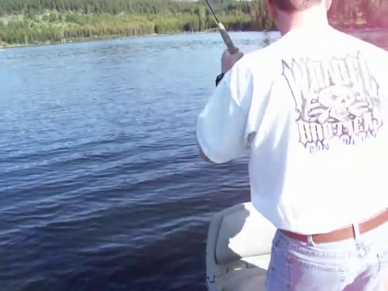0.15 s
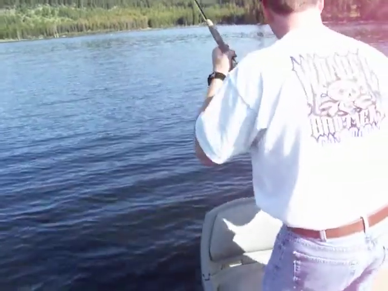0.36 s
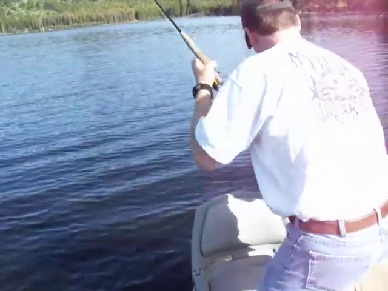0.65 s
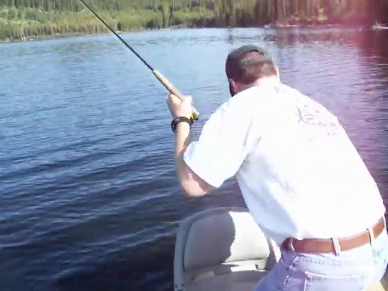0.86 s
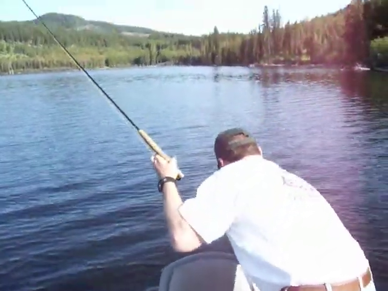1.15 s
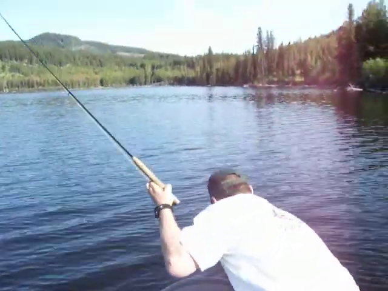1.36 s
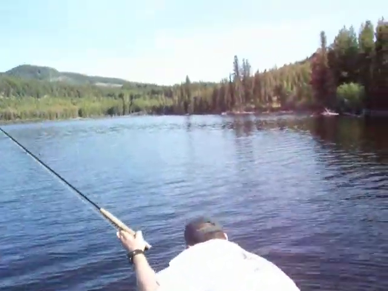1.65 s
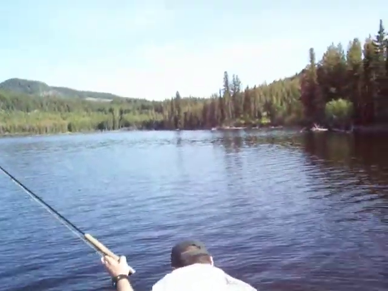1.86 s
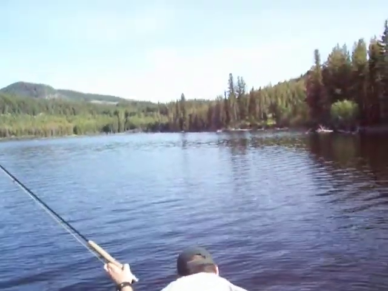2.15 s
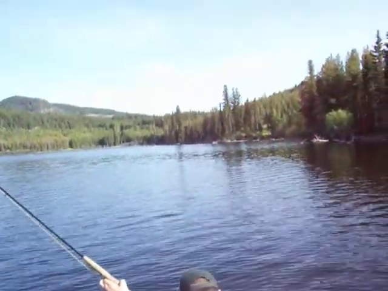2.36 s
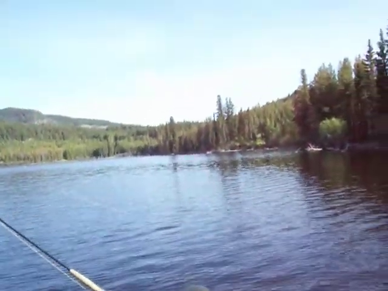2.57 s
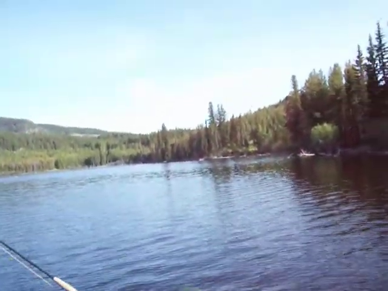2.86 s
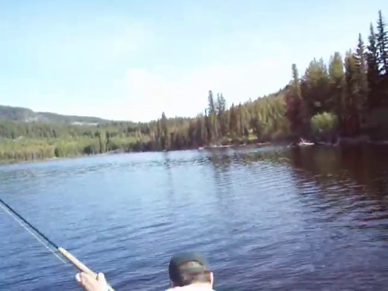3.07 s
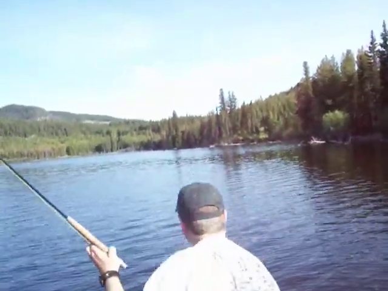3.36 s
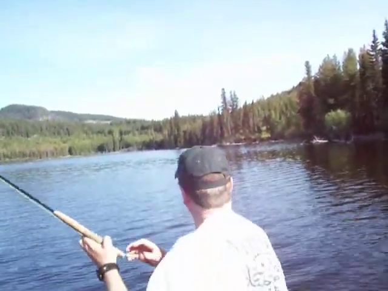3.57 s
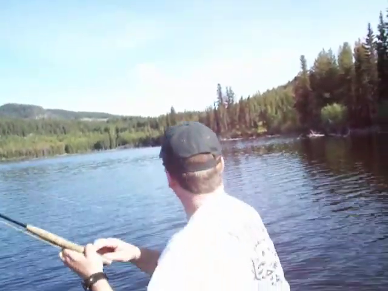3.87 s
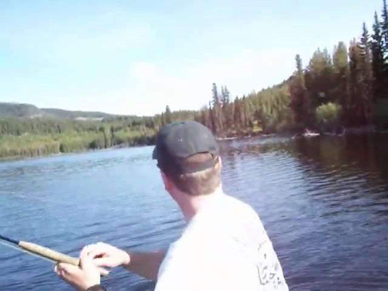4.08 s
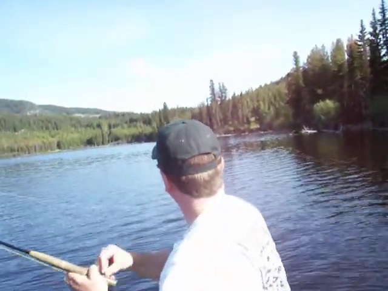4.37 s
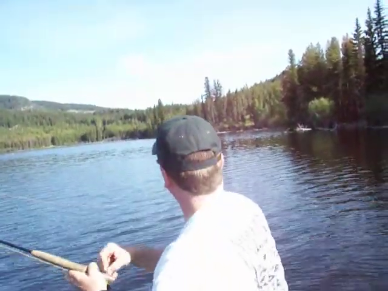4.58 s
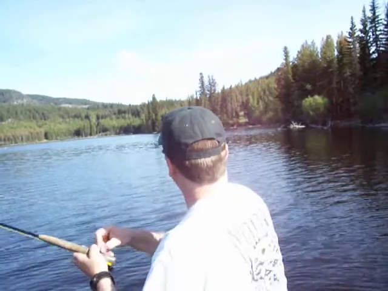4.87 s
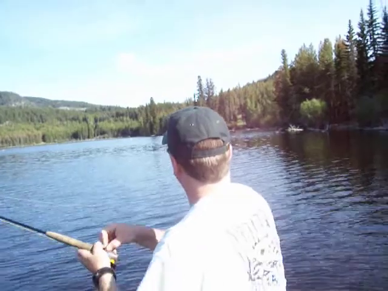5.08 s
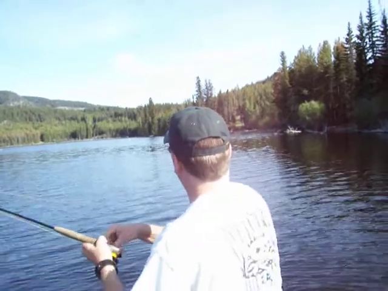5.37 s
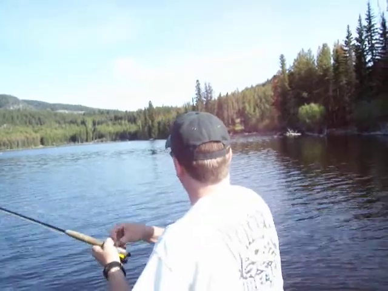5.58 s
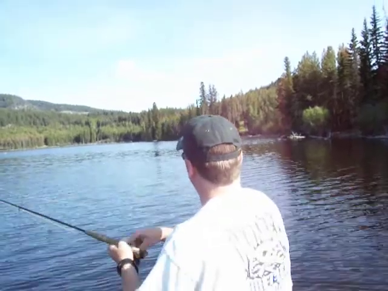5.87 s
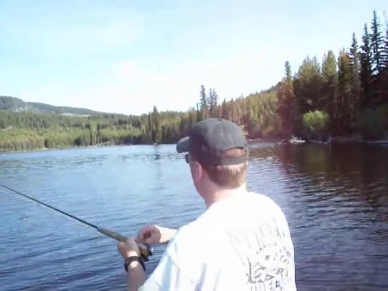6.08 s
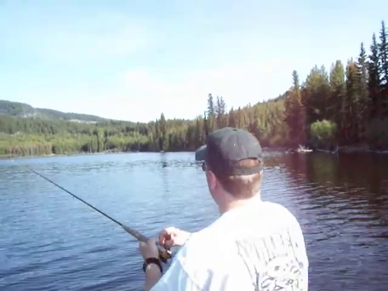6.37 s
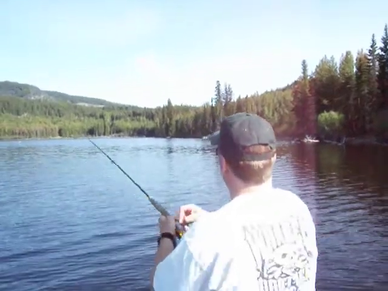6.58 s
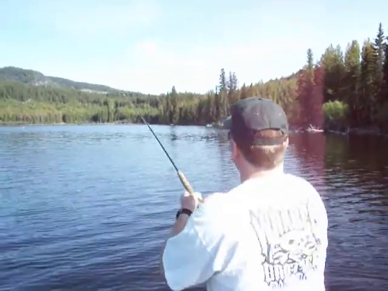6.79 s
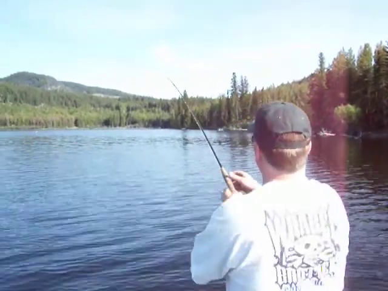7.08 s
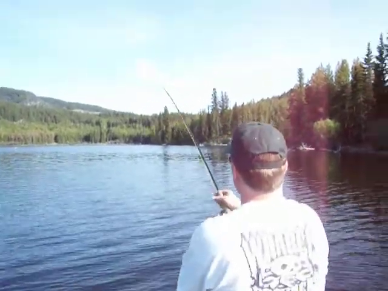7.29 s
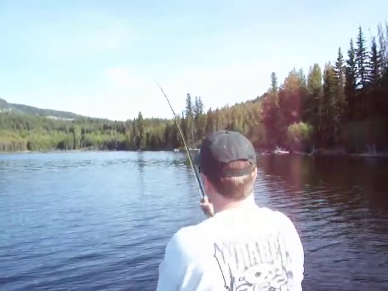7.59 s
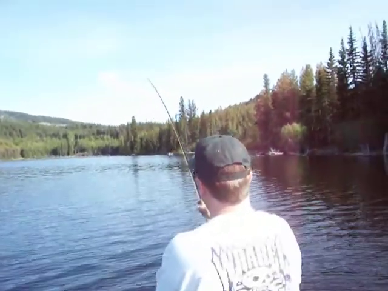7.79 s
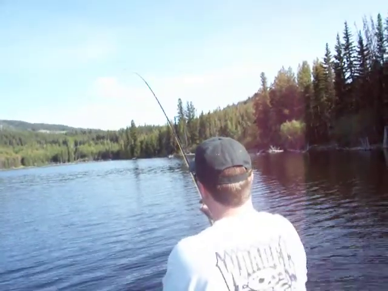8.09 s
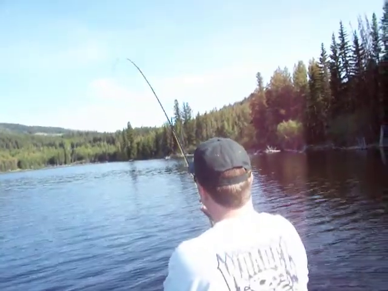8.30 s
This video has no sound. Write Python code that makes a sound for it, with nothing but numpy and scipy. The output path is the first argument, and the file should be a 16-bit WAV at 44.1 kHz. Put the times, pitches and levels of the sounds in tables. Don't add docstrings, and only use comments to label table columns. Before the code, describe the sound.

Outdoors in a small boat, heard close through a small, slightly hissy camera microphone with a faint thin whine and light wind rumble. From 0 to 2.4 seconds an angler shuffles: soft cloth rustles, hollow low hull knocks near 0.4 and 1.2, gritty snaps around 0.7 and 1.1, and scattered ticks and clinks. A heavy thud lands at 2.5, with more bumps and a sharper tap near 2.9. At 3.9 a loud, bright metallic latch snap comes with taps, then a thud. From about 4.3 to 6.1 a fly reel ratchet rasps rapidly, roughly a hundred or more clicks a second, surging and easing with each hand push. It slows to separate clicks, then a quieter, duller second winding runs from 6.2 to 6.8, slowing to a stop. Afterwards only faint murmur, a few light clicks near 7.5, a tap at 8.1 and small metallic ticks around 8.3 remain.

```python
import sys
import numpy as np
from scipy import signal
from scipy.fft import rfft, irfft, next_fast_len
from scipy.io import wavfile
from scipy.ndimage import uniform_filter1d, map_coordinates

SR = 44100
rng = np.random.default_rng(int(sys.argv[2]) if len(sys.argv) > 2 else 0)


def how_loud(loudness_db):
    steps = np.asarray(loudness_db, float) / 20
    return 10 ** steps


def transcribe(signal):
    frames = np.atleast_2d(signal).T
    limited = np.clip(frames, -1, 1)
    pcm = np.round(limited * 32767).astype(np.int16)
    wavfile.write(sys.argv[1], SR, pcm)


N = 372644

# time in seconds, hull murmur in dB.
STIR = [(0, -51), (0.2, -49), (.6, -49), (.9, -46.5), (1.15, -45.5), (1.5, -51), (2.42, -49), (2.54, -44),
        (3.05, -46), (3.3, -50), (3.45, -52), (3.7, -53), (3.85, -48), (4.05, -48), (4.28, -53.5),
        (4.4, -74), (6.85, -66), (7.3, -64.5), (7.55, -65.5), (8.45, -60)]


def unit(x):
    return x / np.sqrt(np.mean(x ** 2) + 1e-20)


def along(points, hz):
    f, v = np.transpose(points)
    return np.interp(np.log(hz + 1), np.log(f + 1), v)


def curves(rows):
    s, *cols = np.transpose(rows)
    return [np.interp(np.arange(N) / SR, s, c) for c in cols]


def wobble(rate):
    knots = rng.standard_normal(int(N * rate / SR) + 4)
    return map_coordinates(knots, [np.arange(N) * rate / SR])


def filtered(x, response):
    m = next_fast_len(N + SR // 2)
    return irfft(rfft(x, m) * response(np.fft.rfftfreq(m, 1 / SR)), m)[:N]


def noise(spectrum):
    return unit(filtered(rng.standard_normal(N), lambda hz: how_loud(along(spectrum, hz))))


def tilted(x, bright_db, split_hz):
    low = filtered(x, lambda hz: 1 / (1 + (hz / split_hz) ** 6))
    return low * how_loud(-bright_db / 2) + (x - low) * how_loud(bright_db / 2)


def patchy(x, depth_db):
    z = signal.stft(x, nperseg=128)[2]
    field = uniform_filter1d(rng.standard_normal(z.shape), size=3, axis=0)
    field = uniform_filter1d(field, size=36, axis=1)
    return signal.istft(z * how_loud(depth_db * unit(field)), nperseg=128)[1][:N]


def add_blow(out, s, db, hz, t60, spread, draw, attack, scatter):
    share = (np.arange(len(draw))[:, None] + .5 + .4 * np.tanh(draw[:, :1])) / len(draw)
    f = np.clip(hz * 2 ** (.6 * spread * np.log(share / (1 - share))), 30, 7800)
    late = draw[:, 2:3] ** 2
    t = np.arange(int(min(t60 * 1.2, .5) * SR)) / SR
    t = np.maximum(t - scatter * late, 0)
    mode_t60 = t60 * (hz / f) ** 0.42
    level_db = 0.86 * draw[:, 1:2] - 9.4 * late - 60 * t / mode_t60
    modes = how_loud(level_db) * np.sin(2 * np.pi * f * t + draw[:, 1:2])
    wave = (modes * (1 - np.exp(-t / attack))).sum(0)
    out[round(s * SR):][:len(wave)] += how_loud(db) * wave / np.abs(wave).max()


def air():
    # frequency in Hz, level in dB per Hz.
    wind_color = [(5, -6), (15, 0), (30, -2), (60, -6), (120, -17), (250, -28), (500, -70)]
    hull_color = [(30, -37.5), (55, -8.5), (115, -4.5), (200, -10), (300, -8), (480, -18), (900, -26),
                  (1500, -59.5), (2600, -120)]
    # time in seconds, wind level in dB.
    gusts = [(0.0, -48), (0.07, -50.5), (0.66, -46.5), (1.29, -51), (3.08, -43.5), (3.72, -62),
             (3.81, -49.5), (4.2, -50), (4.7, -58), (5.5, -55.5), (6.05, -57), (6.17, -46), (6.21, -55),
             (7.7, -53), (7.86, -52.5), (8.33, -54), (8.45, -61)]
    wind = unit(noise(wind_color) * how_loud(1.6 * wobble(9.6)))
    murmur = unit(noise(hull_color) * how_loud(3.05 * wobble(12)))
    return how_loud(curves(gusts)[0]) * wind + how_loud(curves(STIR)[0]) * murmur


def cloth():
    # frequency in Hz, level in dB per Hz.
    rustle_color = [(290, -26.5), (500, -13), (795, -7.5), (980, -2.5), (1220, -4.5), (2420, -10),
                    (5990, -9.5), (8000, -8), (10400, -40.5), (17600, -120)]
    # start in seconds, end in seconds, level in dB, centre in Hz, spread in octaves.
    strokes = [(0.05, 0.269, -47.5, 5200, 1.9), (0.11, 0.39, -53.5, 1500, 2.2),
               (0.663, 0.81, -49, 910, 0.3), (0.68, 0.75, -56.5, 2900, 1.4),
               (1.085, 1.206, -52.5, 3000, 1.7), (1.62, 1.674, -54, 1500, 1.6),
               (1.722, 1.75, -54, 4600, .1), (1.752, 1.772, -54, 4600, .06),
               (1.778, 1.815, -54, 5300, 0.037), (1.697, 1.859, -52, 1470, 2),
               (2.345, 2.478, -53.5, 1560, 1.7), (2.408, 2.452, -54, 5150, .04),
               (2.735, 2.762, -54, 3700, 0.11), (2.755, 2.795, -48, 4400, 0.27),
               (2.772, 2.792, -52, 6800, .05), (2.785, 2.81, -52, 5100, .05), (2.73, 2.83, -52, 1000, .6),
               (2.483, 2.55, -49.5, 1800, 1), (2.53, 2.62, -53.5, 1050, .6), (3.19, 3.4, -58.5, 1070, .3),
               (3.4, 3.75, -58.5, 2700, 1.8), (2.62, 2.642, -52.5, 5000, 0.69), (1.715, 1.79, -57, 990, .8),
               (2.84, 2.927, -47, 2000, 0.63), (3.17, 3.36, -54, 3400, 1.6), (3.733, 3.874, -50, 4520, 1.4),
               (7.562, 7.6, -58.5, 2200, 0.72), (4.124, 4.158, -50, 2700, 0.74),
               (6.87, 6.938, -60.5, 2980, 1.5), (7.227, 7.313, -64.5, 6700, 0.66),
               (7.334, 7.383, -54, 1400, 1.25)]
    usual_db, usual_stir_db, follows = -55.5, -46, 0.72
    out = how_loud(usual_db + follows * (curves(STIR)[0] - usual_stir_db)) * noise(rustle_color)
    grains = rng.standard_normal(N) * how_loud(1.8 * wobble(300))
    for s, end, db, hz, spread in strokes:
        piece = grains[round(s * SR):round(end * SR)]
        f = np.fft.rfftfreq(len(piece), 1 / SR) + 1
        band = irfft(rfft(piece) * np.exp(-(np.log2(f / hz) / spread) ** 2 / 2), len(piece))
        out[round(s * SR):][:len(piece)] += how_loud(db) * unit(band) * signal.windows.tukey(len(piece), .6)
    return out


def grit():
    # time in seconds, peak in dB, pitch in Hz.
    snaps = [(0.657, -39, 5500), (0.669, -40, 3200), (0.71, -51, 4000), (0.742, -43, 3000),
             (0.754, -48, 3800), (0.775, -40, 2500), (1.079, -37, 4000), (1.095, -37, 3200),
             (1.109, -38, 3500), (1.121, -40, 2200), (1.124, -38, 5600), (1.13, -47, 3200),
             (1.139, -41, 5500), (1.149, -38, 5300), (1.154, -44, 3000), (1.184, -41, 2800),
             (1.72, -46, 2600), (1.7302, -46, 4700), (1.751, -47, 2500), (1.813, -40, 6500),
             (1.813, -41, 2700), (1.841, -44, 2200), (2.345, -37, 5000), (2.369, -48, 4000),
             (2.397, -48, 4000), (2.417, -46, 6500), (2.491, -37, 6500), (2.501, -43, 3200),
             (2.53, -42, 6000), (2.545, -45, 2600), (2.565, -45, 6000), (2.605, -48, 4500),
             (2.726, -36, 1600), (2.766, -44, 4800), (3.107, -48, 4500), (3.441, -37, 5000),
             (3.479, -46, 5000), (3.9, -34, 1500), (3.909, -31, 2800), (3.95, -38, 2600),
             (4.118, -46, 1200), (4.162, -36, 1100), (7.541, -48, 3000), (7.5652, -37, 1800)]
    # time in seconds, peak in dB, pitch in Hz, t60 in seconds.
    pings = [(0.662, -47, 2900, .05), (0.76, -41, 900, .15), (1, -42, 1700, .05), (1.138, -44, 3400, 0.044),
             (1.161, -37, 1400, .06), (3.112, -34.5, 1100, 0.087), (7.588, -42, 930, 0.064),
             (7.632, -52, 1800, 0.15), (7.488, -56, 4100, 0.072), (2.515, -26.5, 360, .12),
             (2.7, -30, 500, .12), (5.776, -40.5, 360, .15), (7.175, -50, 400, .12),
             (1.157, -29.5, 527, .1), (8.1, -44, 450, .1), (7.7, -46, 304, .1)]
    out = np.zeros(N + SR)
    for (s, db, hz), d in zip(snaps, rng.standard_normal((len(snaps), 24, 3))):
        add_blow(out, s, db, hz, t60=0.016, spread=.4, draw=d, attack=.0002, scatter=0.00044)
    for (s, db, hz, t60), d in zip(pings, rng.standard_normal((len(pings), 8, 3))):
        octaves = 110 / hz / np.log(2)
        add_blow(out, s, db, hz, t60, octaves, d, attack=.002, scatter=.002)
    return out[:N]


def ticks():
    # time in seconds, peak in dB, pitch in Hz, t60 in seconds.
    taps = [(0.352, -38, 774, 0.11), (0.671, -37.5, 925, 0.071), (0.734, -33.5, 889, .09),
            (0.774, -51, 955, 0.11), (1.105, -36.5, 1290, 0.26), (1.153, -33, 1480, 0.048),
            (1.528, -46, 1890, 0.028), (1.63, -42.5, 1020, 0.34), (1.908, -31.5, 2020, 0.075),
            (2.219, -45.5, 1140, 0.063), (2.345, -39, 913, 0.3), (2.488, -35.5, 1029, 0.27),
            (2.858, -30.5, 2395, 0.055), (2.872, -26.5, 829, 0.19), (3.104, -38, 594, .14),
            (3.192, -44, 968, 0.44), (3.42, -42, 1480, 0.092), (3.445, -35.5, 2240, 0.08),
            (3.91, -29, 2050, 0.071), (3.917, -27, 852, 0.086), (3.944, -37.5, 783, 0.17),
            (4.143, -37, 2400, 0.047), (6.341, -43.5, 1330, 0.074), (6.466, -45, 1430, .048),
            (6.874, -46, 1262, 0.17), (7.343, -44, 1294, .11), (7.543, -38.5, 1040, 0.068),
            (7.565, -41, 1285, 0.15), (7.659, -49.5, 1145, 0.2), (8.097, -31.5, 880, 0.14)]
    # time in seconds, peak in dB, pitch in Hz, t60 in seconds, spread in octaves.
    latch = [
        (3.9007, -16.5, 4790, 0.028, 0.056),
        (3.9, -19.5, 7070, 0.038, 0.082),
    ]
    # time in seconds, peak in dB, pitch in Hz.
    dry_ticks = [(0.6573, -46, 2720), (0.7264, -43, 2590), (1.0742, -41, 3940), (1.136, -45, 3280),
                 (1.17, -35, 5770), (1.2944, -54, 6100), (1.4945, -59, 3070), (1.8096, -39.5, 4420),
                 (2.042, -46, 3100), (2.145, -35.5, 5150), (2.346, -44, 2580), (2.623, -47.5, 2700),
                 (2.726, -40.5, 5770), (2.875, -29, 3700), (3.8564, -32.5, 4200), (3.9904, -36.5, 2590),
                 (4.032, -44.5, 2920), (4.0716, -50, 2880), (4.161, -34.5, 6910), (4.242, -47, 7440),
                 (6.8832, -45, 7200), (7.3352, -46, 3734), (7.542, -51.5, 5120), (7.573, -50, 2910),
                 (7.7034, -54, 5500), (8.097, -37.5, 1920), (8.306, -38, 4340), (2.876, -35.5, 7500),
                 (3.108, -46, 3680), (8.343, -33, 6450)]
    # time in seconds, peak in dB, pitch in Hz, t60 in seconds.
    clinks = [(0.6662, -39, 3620, 0.048), (1.967, -39.5, 4630, 0.06), (2.095, -38.5, 5550, .062),
              (2.488, -36, 3990, 0.055), (3.3993, -34.5, 3280, .088), (3.716, -36.5, 4800, 0.064),
              (3.9, -26, 5300, .057), (7.4831, -41.5, 2710, 0.071), (7.624, -46.5, 2960, .12),
              (7.65, -44.5, 6600, 0.071), (8.2424, -46.5, 7070, 0.049), (8.312, -34, 3270, 0.075)]
    tick_t60_s, tick_octaves, clink_octaves, crack_db = 0.042, 0.15, .12, -3.5
    out = np.zeros(N + SR)
    for (s, db, hz, t60), d in zip(taps, rng.standard_normal((len(taps), 30, 3))):
        octaves = 200 / hz / np.log(2)
        add_blow(out, s, db, hz, t60, octaves, d, attack=0.00045, scatter=0.00531)
    for row, d in zip(latch, rng.standard_normal((len(latch), 12, 3))):
        add_blow(out, *row, d, attack=0.00027, scatter=0.0001)
    bright = [(*row, tick_t60_s, tick_octaves) for row in dry_ticks]
    bright += [(*row, clink_octaves) for row in clinks]
    for (s, db, hz, t60, spread), d in zip(bright, rng.standard_normal((len(bright), 2, 40, 3))):
        add_blow(out, s, db, hz, t60, spread, d[0], attack=0.0001, scatter=.001)
        add_blow(out, s, db + crack_db, 3500, .025, .9, d[1], attack=0.00043, scatter=0.000993)
    return out[:N]


def knocks():
    # time in seconds, peak in dB, pitch in Hz, t60 in seconds.
    thuds = [(0.4, -30, 259, 0.2), (1.184, -24, 240, 0.21), (2.258, -35.5, 155, 0.23),
             (2.497, -14.5, 310, 0.082), (2.8, -31.5, 173, 0.16), (3.007, -25.5, 295, 0.08),
             (3.051, -30.5, 340, 0.055), (3.397, -44.5, 330, 0.26), (3.989, -17.5, 340, 0.1),
             (4.032, -28, 300, .15), (6.255, -41.5, 236, 0.58), (7.173, -44.5, 590, 0.16),
             (1.151, -25, 560, 0.12), (0.38, -28.5, 115, 0.5), (2.505, -25, 125, 0.17),
             (7.8, -43.5, 283, 0.1), (7.55, -47.5, 390, 0.27), (7.949, -37, 22, 0.19),
             (5.969, -53.5, 380, 0.16), (5.78, -45, 200, 0.16), (3.828, -40, 300, 0.18),
             (4.16, -31.5, 640, 0.21), (5.773, -36, 600, .09), (5.795, -37, 580, 0.096),
             (4.1, -36, 300, 0.26), (4.19, -39, 430, .15)]
    # time in seconds, peak in dB, pitch in Hz, relative rap in dB.
    hard_knocks = [(0.357, -30, 214.5, -7.5), (0.794, -44, 174, -7), (0.968, -50, 156, -9),
                   (1.269, -33.5, 222, -13), (1.401, -44, 332, 2.5), (1.492, -39.5, 718, 1.5),
                   (1.743, -33, 259.3, -5), (1.812, -37, 280, -2), (1.89, -41.5, 290, -4),
                   (2.527, -32, 297.5, -12), (2.578, -36.5, 278, -8), (2.821, -31, 290.6, -7.5),
                   (2.877, -26, 358, 1), (3.836, -34.5, 261, -5.5), (3.919, -28.5, 487, -5),
                   (4.366, -52, 358, 4), (5.431, -49, 295, 1), (7.674, -46.5, 393, -8),
                   (8.097, -46, 506, 8)]
    thud_rap_db, ring_cycles = -15.5, 51.6
    out = np.zeros(N + SR)
    blows = [(*row, thud_rap_db) for row in thuds]
    blows += [(s, db, hz, ring_cycles / hz, rap_db) for s, db, hz, rap_db in hard_knocks]
    for (s, db, hz, t60, rap_db), d in zip(blows, rng.standard_normal((len(blows), 2, 14, 3))):
        add_blow(out, s, db, hz, t60, .24, d[0], attack=.011, scatter=.004)
        add_blow(out, s, db + rap_db, 2.7 * hz, 0.61 * t60, .5, d[1], attack=0.00036, scatter=0.0018)
    return out[:N]


def teeth(pushes):
    u = np.linspace(0, 1, 400)
    times = [[pushes[-1][0]]]
    for (s, slack, count), (end, next_slack, _) in zip(pushes, pushes[1:]):
        base = np.cumsum(slack + (next_slack - slack) * u) * (end - s) / len(u)
        push = np.cumsum(np.sin(np.pi * u) ** 2)
        passed = base + (count - base[-1]) * push / push[-1]
        times.append(np.interp(np.arange(count), passed, s + (end - s) * u))
    return np.sort(np.concatenate(times))


def reel():
    # slack time in seconds, teeth per second there, teeth passed until the next slack.
    hand_pushes = [
        [(4.276, 170, 19), (4.378, 95, 18), (4.515, 110, 20), (4.631, 70, 15), (4.746, 105, 22),
         (4.879, 110, 13), (4.976, 90, 24), (5.111, 105, 13), (5.2, 110, 23), (5.314, 85, 14), (5.418, 85, 24),
         (5.566, 90, 13), (5.679, 95, 23), (5.805, 85, 13), (5.902, 100, 24), (6.024, 45, 12), (6.144, 45, 1),
         (6.161, 60, 0)],
        [(6.225, 110, 22), (6.35, 70, 13), (6.45, 80, 22), (6.588, 100, 13), (6.699, 50, 17), (6.828, 40, 0)],
    ]
    # time in seconds, level in dB.
    grips = [
        [(4.28, -30), (4.34, -33.5), (4.385, -34), (4.42, -31.5), (4.5, -34.5), (4.56, -33.5), (4.63, -35),
         (4.68, -32.5), (4.75, -38), (4.8, -35), (4.96, -32.5), (5.1, -33), (5.25, -32.5), (5.36, -32),
         (5.44, -37.5), (5.48, -35), (5.75, -34.5), (5.88, -37), (5.98, -35.5), (6.16, -37.5)],
        [(6.23, -40), (6.27, -38), (6.34, -39.5), (6.42, -35.5), (6.46, -39), (6.52, -37.5), (6.6, -38.5),
         (6.65, -37), (6.72, -40.5), (6.78, -39), (6.83, -40)],
    ]
    # frequency in Hz, level in dB per Hz.
    frame = [(530, -38.5), (900, -31.5), (1160, -22), (1520, -26.5), (2600, -13), (2930, -15.5),
             (3850, -14), (4420, -9), (5400, -5.5), (7230, 3.5), (8000, 3), (10400, -40.5), (17600, -120)]
    # frequency in Hz, width in Hz, level in dB.
    spool = [(2430, 70, -5), (2620, 68, 2.5), (3470, 45, 4), (4330, 59, 8.5), (1725, 61, 0),
             (2060, 64, -4.5), (4800, 510, 1.5)]
    # time in seconds, share.
    shimmer = [(4.27, .15), (5.4, .18), (6.16, .2), (6.22, .32), (6.85, .32)]
    # time in seconds, brightness in dB.
    brightness = [(4.28, -0.5), (4.4, -0.5), (4.52, -0.5), (4.62, -1.5), (4.76, 1), (4.97, 1), (5.06, -1.5),
                  (5.36, -3), (5.44, -1), (5.5, -4.5), (5.76, -1), (5.88, -3.5), (6.1, -3.5), (6.26, -4),
                  (6.45, -3.5), (6.65, -4), (6.75, -2), (6.83, -2.5)]
    full_bend, slow_bend, creep_loss_db = 1.15, 0.65, 1.5
    strikes, quick, slow = np.zeros((3, N))
    for pushes, grip in zip(hand_pushes, grips):
        s = teeth(pushes)
        draw = rng.standard_normal((len(s), 6))
        gap = 150 * np.gradient(s)
        drag = np.clip(gap - 1.5, 0, 1)
        size = how_loud(np.interp(s, *np.transpose(grip)) + 7.0 + 0.19 * draw[:, 2])
        size = size * np.minimum(gap, full_bend) ** slow_bend * how_loud(-creep_loss_db * drag)
        at = np.round((s - .0016 + .00015 * draw[:, 0]) * SR).astype(int)
        clean = np.minimum(gap, 1.2) ** 0.22
        strike_at = at + 70 + np.round(7 * draw[:, 3]).astype(int)
        strike_gain = how_loud(11.5 + 2.5 * np.tanh(.8 * draw[:, 1]))
        strikes[strike_at] = size * clean * strike_gain * np.sign(draw[:, 0])
        quick[at], slow[at] = size * (1 - drag), size * drag
        rebound_at = at + np.round(130 + 25 * draw[:, 4]).astype(int)
        quick[rebound_at] += size * how_loud(-13 + 2 * draw[:, 5])
    t = np.arange(SR // 20) / SR

    def burst(width):
        return np.exp(-((t - .0016) / np.where(t < .0016, .0008, width)) ** 2)

    gate = signal.fftconvolve(quick, burst(.0012))[:N] + signal.fftconvolve(slow, burst(.0035))[:N]
    buzz = signal.fftconvolve(quick + slow, np.exp(-t / .009))[:N]
    gate = gate + curves(shimmer)[0] * buzz
    clicks = filtered(strikes + gate * rng.standard_normal(N), lambda f: how_loud(along(frame, f)))
    for hz, width, db in spool:
        facing = how_loud(db + 2 * wobble(40) + .7 * wobble(9))
        clicks = clicks + filtered(clicks * facing, lambda f: 1j * f * width / (hz * hz - f * f + 1j * f * width))
    clicks = tilted(how_loud(4.1) * clicks, curves(brightness)[0] + 1.5 * wobble(60), split_hz=5600)
    return patchy(clicks, depth_db=1.2)


def scene():
    background = air() + cloth()
    hits = grit() + ticks() + knocks() + reel()
    echo = how_loud(-15) * np.roll(hits, 130)
    return (background + hits + echo)[None]


def low_pass(x):
    return signal.sosfilt(signal.butter(12, 9100, fs=SR, output="sos"), x)


def record(dry):
    # time in seconds, gain in dB.
    gain = [(0, -3.5), (2.5, -4.5), (2.55, -8.5), (3.8, 0.5), (3.95, -18), (4.3, -2.5), (5, -10),
            (6.85, -11), (8.45, -13)]
    # frequency in Hz, level in dB per Hz.
    hiss_color = [(59, -36.5), (100, -7.5), (220, -46.5), (259, -3), (348, -14.5), (410, -7), (3640, -17),
                  (6420, -26.5), (8000, -47.5), (10400, -72), (17600, -120)]
    # frequency in Hz, gain in dB.
    playback = [(7000, -0.5), (8000, -4.5), (8500, -17), (9000, -36), (9400, -77), (10500, -120)]
    hiss_db, whine_hz, whine_db = -58.5, 6210, -67.5
    fold_hz, null_hz = 8000, 7870
    t = np.arange(N) / SR
    whine = how_loud(whine_db + 5 + 1.2 * wobble(34)) * np.sin(2 * np.pi * whine_hz * t + 1.2 * wobble(5))
    x = dry[0] + how_loud(curves(gain)[0]) * (how_loud(hiss_db) * noise(hiss_color) + whine)

    def before_sampling(hz):
        edge = np.sqrt(.5 - .5 * np.tanh((hz - fold_hz) / 30))
        return edge * (null_hz - hz) / (null_hz - hz + 45j)

    x = filtered(x, before_sampling)
    images = 1 + 2 * np.cos(2 * np.pi * 2 * fold_hz * t)
    x = filtered(x * images, lambda hz: how_loud(along(playback, hz)))
    return low_pass(x[None])


dry = scene()
out = record(dry)
transcribe(out)
```